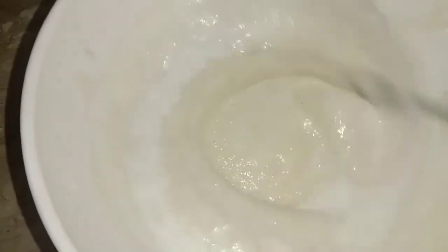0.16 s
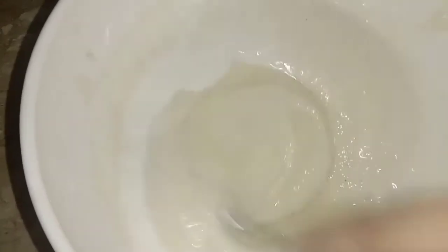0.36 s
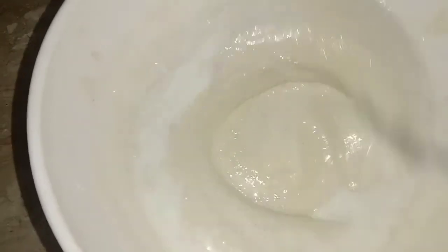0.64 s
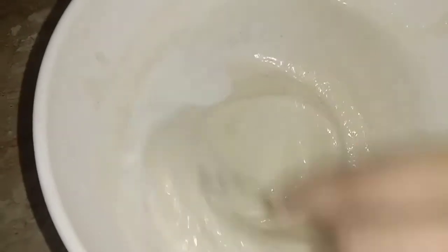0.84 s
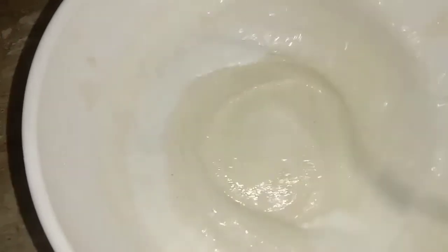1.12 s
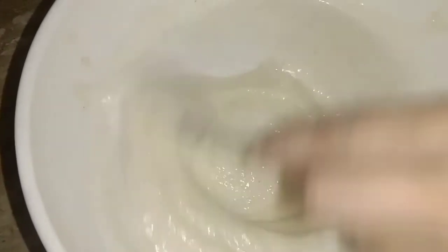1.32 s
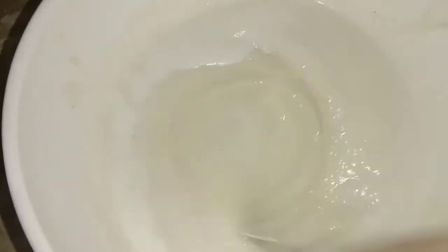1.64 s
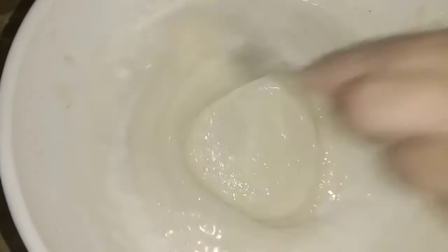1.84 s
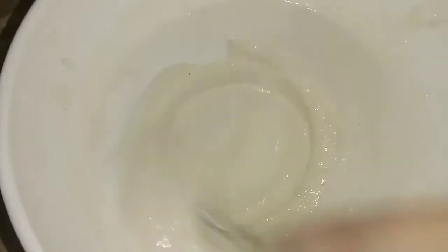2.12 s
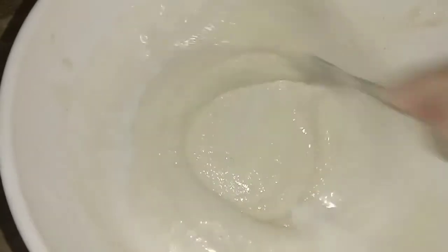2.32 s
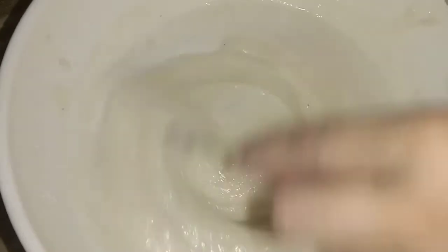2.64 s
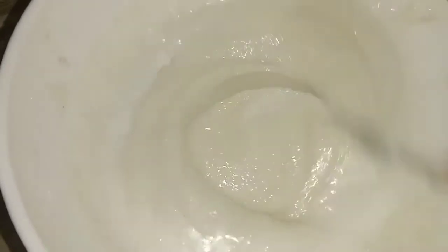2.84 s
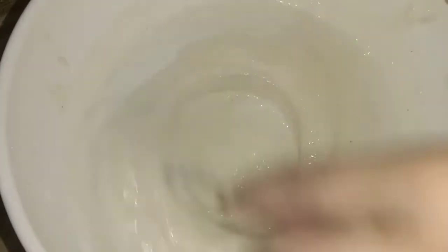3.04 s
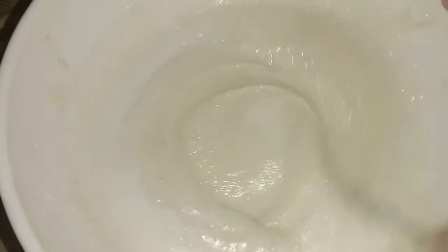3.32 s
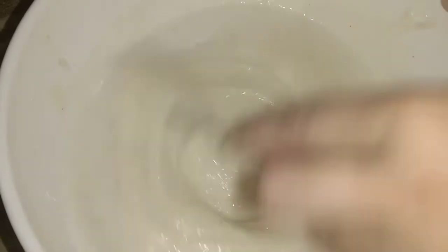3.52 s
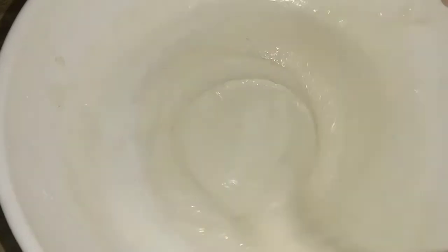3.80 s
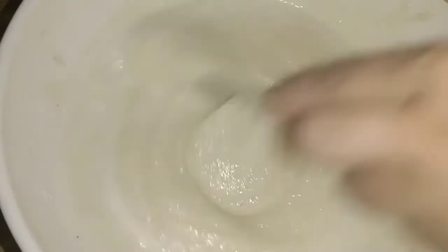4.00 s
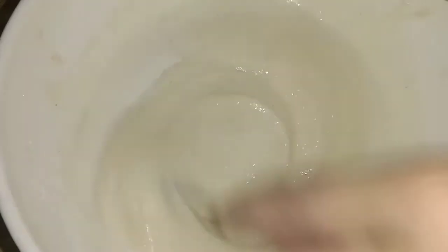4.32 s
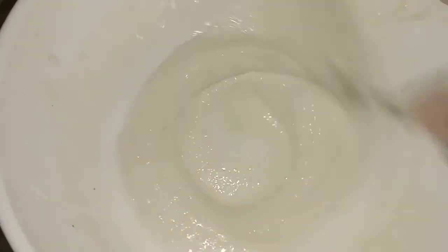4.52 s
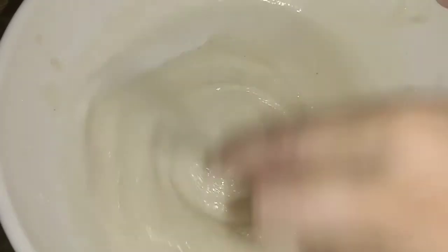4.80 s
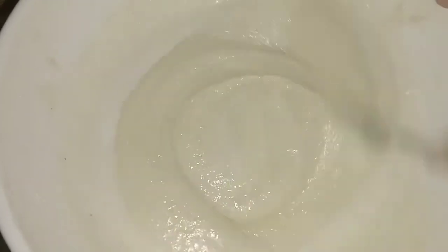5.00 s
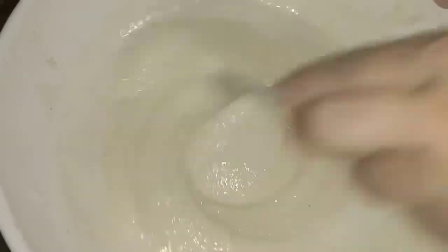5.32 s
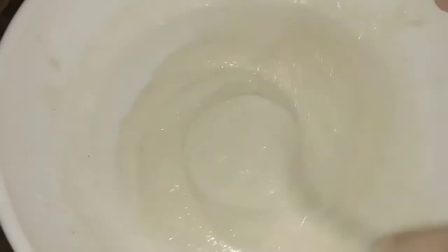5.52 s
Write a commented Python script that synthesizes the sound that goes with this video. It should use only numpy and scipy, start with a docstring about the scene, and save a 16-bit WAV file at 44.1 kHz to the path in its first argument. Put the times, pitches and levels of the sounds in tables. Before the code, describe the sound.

A metal spoon circles a plastic bowl of thin batter, scraping softly then harder, with dull regular knocks and faint wet gurgles.

```python
"""Stirring batter in a bowl

A metal spoon circles a plastic bowl of thin batter, a little over two turns a second, in a quiet kitchen.
Shaped noise scrapes round the wall; gliding tones gurgle behind the spoon, over crackling bubbles and a dull slosh.
Most turns knock the side: decaying modes of bowl and spoon, with noise and a low worktop boom.
About two seconds in, hard rubbing brings rough squealing tones and a judder of the lowest wall modes."""
import sys
import numpy as np
from scipy import signal
from scipy.fft import rfft, irfft
from scipy.io import wavfile

SR = 44100
rng = np.random.default_rng(int(sys.argv[2]) if len(sys.argv) > 2 else 0)


def store_wav(level_fs):
    """Save 16-bit WAV to argv[1]."""
    pcm = np.round(np.clip(np.atleast_2d(level_fs), -1, 1) * 32767)
    wavfile.write(sys.argv[1], SR, pcm.T.astype(np.int16))


N = 249606
T = np.arange(N) / SR  # seconds
FREQS = np.maximum(np.arange(N // 2 + 1) * SR / N, 1)  # Hz

# turns of the spoon: lands_s, sweep_start_s, sweep_length_s, slide_db, sweep_db, wake_db, lifted_db,
# hiss_db (relative to the scrape)
TURNS = [(-.12, 0.067, 0.035, -51, -43, -53.5, -81, 1.5), (0.321, 0.506, 0.048, -55.5, -45, -52.5, -81, -1),
         (0.753, .937, 0.048, -60, -47, -53, -74, 2), (1.2, 1.381, 0.021, -58, -44.5, -51, -77.5, 2),
         (1.623, 1.816, 0.063, -48.5, -40, -35, -35, -0.5),
         (2.043, 2.232, 0.035, -34, -36.5, -40.5, -60.5, -4),
         (2.501, 2.705, 0.029, -48, -36, -41, -51.5, -8.5),
         (2.942, 3.145, 0.031, -41.5, -36.5, -41, -57, -9),
         (3.37, 3.572, 0.022, -45.5, -36.5, -44.5, -65, -6.5),
         (3.817, 4.01, 0.033, -52, -43, -50, -67.5, -5.5),
         (4.227, 4.439, 0.021, -48, -35.5, -43, -62, -7.5), (4.663, 4.87, 0.031, -47.5, -41, -48, -79, -5),
         (5.113, 5.311, 0.052, -53.5, -47, -52, -69, -6.5)]
# colour of the scrape before and after the spoon changes its angle: freq_hz, gain_db
FIRST_ANGLE_COLOUR = [(150, -26.5), (250, -17.5), (452, -17), (640, -21), (955, -14.5), (1140, -8),
                      (1380, -8.5), (1760, -15.5), (3060, 2), (4410, -22), (5830, -7), (6820, -19.5),
                      (9010, -28.5), (14700, -31), (16000, -47.5)]
LATER_ANGLE_COLOUR = [(150, -32), (250, -8), (519, -10), (576, -12), (955, -12.5), (1400, -9), (1980, -27),
                      (2910, 7.5), (3580, 3), (4730, -12.5), (5830, -10.5), (7310, -10), (9010, -26),
                      (14900, -23.5), (16000, -52)]
# resonances that the rubbing excites at each angle: freq_hz, width_hz, boost_db
FIRST_ANGLE_RESONANCES = [(460, 13, 0.5), (2600, 640, 2.5), (2900, 160, 1.5), (3350, 580, 0),
                          (4200, 120, 1), (4470, 700, 2.5), (5640, 1500, 0), (6870, 480, 8.5)]
LATER_ANGLE_RESONANCES = [(2020, 490, 10.5), (2950, 140, 3), (3646, 380, 6), (3966, 46, 12),
                          (4700, 390, -1), (5560, 110, 5), (7600, 780, -1.5)]
# brief drags of the spoon on bare wall: peak_s, level_db
BARE_WALL_DRAGS = [(0.419, -46), (.795, -44.5), (1.495, -48), (1.731, -42.5), (2.3, -40), (2.385, -38.5),
                   (2.834, -38), (3.208, -37.5), (3.691, -39), (4.56, -42.5), (5.166, -41), (5.219, -48),
                   (5.452, -45), (5.637, -34)]
# spoon striking the wall: start_s, strength_db (relative), contact_cutoff_hz,
# spoon_ring_db (relative to the bowl), boom_db (relative)
KNOCKS = [(0.317, -24.5, 1800, -1, -66), (0.758, -45, 6000, -16, -81), (1.381, -37, 12000, 0, -77),
          (1.6122, -4.5, 1630, -33, -43.5), (2.0596, 3, 4630, -38, -40), (2.4911, 3.5, 6100, -9, -43.5),
          (2.9379, -3.5, 3600, -7, -48), (3.3604, 1.5, 7950, -1.5, -41), (3.8058, -3, 6500, -1.5, -45),
          (4.2197, 1, 6200, -2, -41), (4.6522, 2, 5600, -4.5, -36)]
# modes of the bowl damped by batter: freq_hz, level_db, t60_s (limited to LONGEST_RING_S)
BOWL_MODES = [(581.6, -6.5, 0.053), (671, -8.5, 0.038), (890, -19, 0.0096), (1002, -10, 0.026),
              (1096, -17, 0.031), (1438, -10, 0.062), (1629, -11, 0.066), (2068, -2.5, 0.043),
              (2108, 0, 0.027), (2600, 0.5, 0.038), (2698, -0.5, 0.016), (2777, -2, 0.038),
              (3173, -2.5, 0.059), (4920, -13.5, 0.077), (5516, -7, 0.033), (6130, -30, 0.028),
              (6020, -9, 0.055), (6900, -11.5, .03)]
# modes of the spoon held against the wall: freq_hz, level_db, t60_s (limited to LONGEST_RING_S)
SPOON_MODES = [(3580, 4, 0.06), (3820, -3.5, 0.098), (4165, 3, 0.028), (7520, -2, 0.046),
               (7850, -4.5, 0.033), (8450, -27, 0.015)]
# low boom of the bowl on the worktop: freq_hz, level_db, t60_s
WORKTOP_MODES = [(178, -2.5, .11), (218, 1, .12), (258, 0, .12), (326, 2, .15), (362, -4, .1)]
# squeals under hard pressure: start_s, length_s, level_db (relative), bending_lead_db (modes near 5 kHz)
SQUEALS = [(1.82, 0.034, -45, 0), (2.022, 0.011, -31.5, 3.5), (2.095, .05, -27.5, -2),
           (2.16, 0.056, -36, 0), (2.242, 0.0055, -30.5, 8)]
# modes of the squealing spoon: freq_hz, pitch_wander_hz, level_db
SQUEAL_MODES = [(3190, 44, -1.5), (4756, 60, -0.5), (5090, 64, -4.5), (5240, 100, -7), (6420, 70, -2.5),
                (6660, 40, 3.5), (7100, 90, -8.5), (8120, 150, -5.5), (10670, 490, -11.5), (14200, 700, -9)]
# strongest slips that shake the wall: start_s, peak_db
WALL_SLIPS = [(2.023, -22), (2.079, -26), (2.106, -21.5), (2.161, -21), (2.214, -23.5), (2.295, -24.5),
              (2.379, -20.5), (2.426, -32)]
# shudder of the bowl wall under hard rubbing: time_s, moan_db (relative), slip_pitch_hz
WALL_SHUDDER = [(1.66, -45.5, 653), (2.002, -36.5, 648.4), (2.02, -32.5, 644.8), (2.098, -27, 646.6),
                (2.32, -36.5, 647), (2.354, -42.5, 695.4), (2.386, -30.5, 689), (2.47, -38.5, 696)]
# air pockets behind the spoon: start_s, length_s, upper_hz, upper_db, lower_hz, lower_db
AIR_POCKETS = [(0.113, .085, 1333, -60.5, 846, -57.5), (0.31, .02, 1413, -66, 594, -53),
               (.98, 0.084, 1210, -56, 768, -54.5), (1.175, 0.057, 1427, -54.5, 683, -85),
               (1.427, .09, 1120, -60, 707, -57), (2.696, 0.16, 1305, -64.5, 763, -60.5),
               (2.837, .1, 1270, -83, 594, -58.5), (3.091, .2, 1267, -66, 328, -64),
               (3.512, 0.237, 1388, -55, 578, -55), (4.059, 0.098, 1390, -79, 792, -66),
               (4.341, 0.1, 1596, -59.5, 338, -56), (4.42, 0.209, 1670, -52, 472, -58.5),
               (4.724, 0.066, 1630, -47, 608, -58), (5.088, 0.12, 1442, -60.5, 566, -64.5)]
# spectrum of the quiet kitchen: freq_hz, gain_db
KITCHEN_COLOUR = [(25, -8), (60, -6.5), (100, 10), (160, 10), (240, -2), (500, -4.5), (1500, -45),
                  (4000, -53), (16000, -8.5)]

ANGLE_CHANGE_S = 2.5
LAST_LANDING_S, LAST_SLIDE_DB = 5.55, -52  # the spoon comes round once more
# shape of a turn: swell into the sweep, move to the wake level, lift off the wall, hang before landing
SWELL_S, WAKE_S, LIFT_S, LAND_S = 0.033, 0.048, 0.09, 0.026
WAKE_SAG_DB, SWEEP_HISS_DB, LIFT_HISS_DB = 7, 2.5, 1
DRAG_ATTACK_S, DRAG_RELEASE_S, DRAG_HISS_DB = 0.0044, 0.017, -11.5
LONGEST_RING_S = 0.06  # upper limit on ring time of bowl and spoon, so the knocks stay short and dull
SQUEAL_ATTACK_S, SQUEAL_RELEASE_S = 0.0034, 0.019
SHUDDER_DB = -3
POCKET_GLIDE, POCKET_WOBBLE = 0.024, 0.026  # share by which pitch starts high and ends low; share of flutter
SLOSH_DB = -27  # relative to the scrape
KITCHEN_DB = -65.5
TOP_HZ = 16100


def scrape():
    """The spoon slides round the wall, brighter where it runs fast."""
    scrape_db, hiss_db = with_drags(*stirring_levels())
    first = rub(FIRST_ANGLE_COLOUR, FIRST_ANGLE_RESONANCES, scrape_db, hiss_db,
                grain_db=1.0, flutter_db=1.64)
    later = rub(LATER_ANGLE_COLOUR, LATER_ANGLE_RESONANCES, scrape_db, hiss_db,
                grain_db=2.0, flutter_db=2.35)
    return drift(np.where(T < ANGLE_CHANGE_S, first, later), depth_db=1.9, rate=50)


def stirring_levels():
    """Scrape and hiss in dB: most turns land, slide, sweep brighter, fade and lift;
    the hard-pressed turn near 1.6 s stays loud into the next."""
    points = []
    next_landings = [turn[0] for turn in TURNS[1:]] + [LAST_LANDING_S]
    for turn, next_landing in zip(TURNS, next_landings):
        lands, start, length, slide_db, sweep_db, wake_db, lifted_db, hiss_db = turn
        stop = start + length
        bright_db = hiss_db + SWEEP_HISS_DB
        points += [
            (lands, slide_db, hiss_db),
            (start - SWELL_S, slide_db, hiss_db),
            (start, sweep_db, bright_db),
            (stop, sweep_db, bright_db),
            (stop + WAKE_S, wake_db, hiss_db),
            (next_landing - LIFT_S, wake_db - WAKE_SAG_DB, hiss_db),
            (next_landing - LAND_S, lifted_db, hiss_db + LIFT_HISS_DB),
        ]
    points.append((LAST_LANDING_S + SWELL_S, LAST_SLIDE_DB, hiss_db))
    times, scrape_db, hiss_db = np.transpose(sorted(points))
    return np.interp(T, times, scrape_db), np.interp(T, times, hiss_db)


def with_drags(scrape_db, hiss_db):
    """Brief dull drags bite, die away and add their power to the scrape."""
    drags = 0
    for peak_s, db in BARE_WALL_DRAGS:
        decay = np.maximum((peak_s - T) / DRAG_ATTACK_S, (T - peak_s) / DRAG_RELEASE_S)
        drags = drags + undb(db) * np.exp(-decay)
    body = np.hypot(undb(scrape_db), drags)
    hiss = np.hypot(undb(scrape_db + hiss_db), undb(DRAG_HISS_DB) * drags)
    return 20 * np.log10(body), 20 * np.log10(hiss / body)


def rub(colour, resonances, scrape_db, hiss_db, grain_db, flutter_db):
    """Dense tiny catches of metal on wet plastic, bunched by the unsteady hand."""
    is_catch = rng.random(N) < 3500 / SR  # about 3500 catches a second
    grain = undb(grain_db * np.minimum(rng.exponential(size=N), 5))
    catches = is_catch * rng.standard_normal(N) * grain
    smooth_rubbing = rng.standard_normal(N)
    force = (unit(catches) + smooth_rubbing) * undb(flutter_db * walk(110))

    boost_db = sum(db * np.exp(-2 * ((FREQS - hz) / width) ** 2) for hz, width, db in resonances)
    gain = contour(colour) * undb(boost_db) * wall_modes(ripple_db=2.2)
    treble = 1 / (1 + (4600 / FREQS) ** 10)  # crossover between body and hiss

    # each part is levelled by the rms of a band inside it
    body_rms = np.std(shape(force, gain * (FREQS > 2200) * (FREQS < 4400)))
    hiss_rms = np.std(shape(force, gain * (FREQS > 5000) * (FREQS < 9000)))
    body = shape(force, gain * (1 - treble)) / body_rms
    hiss = shape(force, gain * treble) / hiss_rms
    return undb(scrape_db) * (body + undb(hiss_db) * hiss)


def wall_modes(ripple_db):
    """The crowded upper modes of the bowl ripple the spectrum every hundred Hz or so."""
    hz = np.linspace(0, SR / 2, 190)
    return undb(ripple_db * np.interp(FREQS, hz, rng.standard_normal(len(hz))))


def drift(x, depth_db, rate):
    """The contact point travels, so neighbouring quarter-octave bands swell and fade on their own."""
    place = 4 * np.log2(np.clip(FREQS, 500, 16000) / 500)
    spectrum = rfft(x)
    out = np.zeros(N)
    for k in range(21):
        band = irfft(spectrum * np.maximum(1 - abs(place - k), 0), N)
        out += band * undb(depth_db * walk(rate))
    return out


def knocks():
    """Each blow rings bowl and spoon; batter between them dulls it; the worktop booms a moment later."""
    out, t = np.zeros(N), T[:SR // 3]
    bowl, spoon = limit_ring(BOWL_MODES), limit_ring(SPOON_MODES)
    contact = 1 - np.exp(-t / 0.0005)
    late_swell = 1 - np.exp(-(t / 0.024) ** 2)
    for start, db, contact_hz, spoon_db, boom_db in KNOCKS:
        bowl_ring = ring(bowl, t, scatter_db=1.0, wobble=0.016)
        spoon_ring = undb(spoon_db) * ring(spoon, t, scatter_db=1.0, wobble=0.022)
        crack = undb(-3) * band_noise(t, 520, 19845) * np.exp(-t / 0.0098)
        # a diffuse, uneven noise tail of the bowl's dense modes dies away, with a duller part swelling in
        tail_gain = undb(-23.0 + 4.6 * walk(400, size=len(t)))
        tail = tail_gain * band_noise(t, 680, 5100) * np.exp(-t / 0.036)
        dull_gain = undb(-21.5 + 1.6 * walk(150, size=len(t)))
        dull_tail = dull_gain * band_noise(t, 590, 2500) * np.exp(-t / 0.029) * late_swell
        blow = (bowl_ring + spoon_ring + crack + tail + dull_tail) * contact
        add(out, start, undb(db - 16.0) * lowpass(blow, contact_hz))

        boom = ring(WORKTOP_MODES, t, scatter_db=1.5, wobble=0.04) * late_swell
        thud = undb(-18.5) * band_noise(t, 74, 280) * np.exp(-t / 0.018)
        add(out, start, undb(boom_db + 12.5) * (boom + thud))
    return out


def limit_ring(modes):
    """Limit every mode's ring time, so the knocks stay short and dull."""
    return [(hz, db, min(t60, LONGEST_RING_S)) for hz, db, t60 in modes]


def ring(modes, t, scatter_db, wobble):
    """Decaying modes; each blow weights them anew and the sloshing batter detunes them."""
    out = 0
    for mode_hz, db, t60 in modes:
        hz = mode_hz * (1 + wobble * walk(263, size=len(t)))
        phase = 2 * np.pi * (rng.random() + np.cumsum(hz) / SR)
        level = undb(db + scatter_db * rng.standard_normal())
        out = out + level * np.sin(phase) * np.exp(-np.log(1000) * t / t60)
    return out


def squeal():
    """Pressed hard, the spoon sticks and slips and sings roughly in its own modes, in short bursts."""
    level, bending_level = 0, 0
    for start, length, db, lead_db in SQUEALS:
        attack = np.minimum(T - start, 0) / SQUEAL_ATTACK_S
        release = np.maximum(T - start - length, 0) / SQUEAL_RELEASE_S
        burst = np.exp(attack - release)
        level = np.maximum(level, undb(db) * burst)
        bending_level = np.maximum(bending_level, undb(db + lead_db) * burst)
    tones = 0
    for mode_hz, wander_hz, mode_db in SQUEAL_MODES:
        phase = 2 * np.pi * np.cumsum(mode_hz + wander_hz * walk(900)) / SR
        is_bending = abs(mode_hz - 5000) < 600
        mode_level = bending_level if is_bending else level
        tones = tones + mode_level * undb(mode_db + 2.5 * walk(220)) * np.sin(phase)
    # every burst also rasps over the whole treble
    rasp = undb(-5 + 2.5 * walk(400)) * lowpass(band_noise(T, 4300, 16000), 7500, order=1)
    return (tones + level * rasp) * undb(-2.0)


def judder():
    """Hard rubbing keeps the lowest wall modes shuddering; each slip swells them and the batter soon damps them."""
    swells, t = np.zeros(N), T[:SR // 8]
    swell = (1 - np.exp(-(t / 0.0033) ** 2)) * np.exp(-t / 0.013)
    for start, db in WALL_SLIPS:
        add(swells, start, undb(db) * swell / swell.max())
    times, moan_db, wall_hz = np.transpose(WALL_SHUDDER)
    hz = np.interp(T, times, wall_hz) * (1 + 0.0392 * walk(250))
    slips = swells * np.sin(2 * np.pi * np.cumsum(hz) / SR)
    moan_gain = undb(np.interp(T, times, moan_db, left=-120, right=-120) + SHUDDER_DB)
    return slips + moan_gain * band_noise(T, 577, 735)


def gurgles():
    """The hollow behind the spoon opens quickly, resonates roughly and sinks in pitch as the batter closes in."""
    out = np.zeros(N)
    for start, length, upper_hz, upper_db, lower_hz, lower_db in AIR_POCKETS:
        n = int(length * SR)
        for centre_hz, db in ((upper_hz, upper_db), (lower_hz, lower_db)):
            roughness = 1 + 0.45 * walk(300, size=n)
            glide = POCKET_GLIDE * np.linspace(1, -1, n)
            hz = centre_hz * (1 + glide + POCKET_WOBBLE * walk(343, size=n))
            opening = np.sqrt(np.abs(np.sin(np.linspace(0, np.pi, n))))
            swell = opening * undb(1.8 * walk(132, size=n))
            tone = np.sin(2 * np.pi * np.cumsum(hz) / SR)
            add(out, start, undb(db) * unit(swell * roughness * tone))
    return out


def bubbles():
    """Tiny bubbles crackle at random moments as short rising chirps, as loud as the spoon is brisk."""
    out, t = np.zeros(N), T[:SR // 50]
    scrape_db, hiss_db = stirring_levels()
    for when, pitch, strength in rng.random(size=(700, 3)):
        i = int(when * N)
        hz = 2600 * 3 ** pitch
        # higher bubbles follow the hiss more; a few stand out
        db = scrape_db[i] + pitch * (hiss_db[i] - 1.5) - 2 + 14 * strength ** 3
        chirp = np.sin(2 * np.pi * hz * t * (1 + 5 * t)) * np.exp(-t * hz / 7)
        add(out, T[i], undb(db) * chirp)
    return out


def slosh():
    """The batter that the spoon pushes ahead rushes dully, as loud as the spoon is brisk."""
    scrape_db, _ = stirring_levels()
    return undb(scrape_db + SLOSH_DB + 3 * walk(40)) * band_noise(T, 35, 330)


def kitchen():
    """Faint steady noise, mostly low rumble."""
    return undb(KITCHEN_DB) * unit(shape(rng.standard_normal(N), contour(KITCHEN_COLOUR)))


def room(x, wet_db, t60_low, t60_high):
    """Diffuse kitchen echo of decaying noise, with separate ring times below and above about 2.9 kHz."""
    t = T[:SR // 2]
    noise = rng.standard_normal(len(t))
    low = lowpass(noise, 2900)
    low_tail = low * np.exp(-np.log(1000) * t / t60_low)
    high_tail = 0.5 * (noise - low) * np.exp(-np.log(1000) * t / t60_high)
    tail = (low_tail + high_tail) * (1 - np.exp(-(t / 0.0082) ** 2))
    return x + undb(wet_db) * signal.fftconvolve(x, tail / np.linalg.norm(tail))[:N]


def undb(db):
    """Decibels to gain."""
    return 10 ** (np.asarray(db) / 20)


def unit(x):
    """Scale to rms 1."""
    return x / np.sqrt(np.mean(x ** 2))


def add(out, start, sound):
    """Mix a sound in at a time in seconds."""
    i = max(int(start * SR), 0)
    out[i:i + len(sound)] += sound[:max(N - i, 0)]


def contour(points):
    """Gain at every frequency from (Hz, dB) points."""
    hz, db = np.transpose(points)
    return undb(np.interp(np.log(FREQS), np.log(hz), db))


def shape(x, gain):
    """Filter by a gain at every frequency."""
    return irfft(rfft(x) * gain, N)


def lowpass(x, hz, order=2):
    """Causal low-pass."""
    return signal.sosfilt(signal.butter(order, hz, fs=SR, output="sos"), x)


def band_noise(t, low_hz, high_hz):
    """Noise between two frequencies, at rms 1."""
    sos = signal.butter(3, [low_hz, high_hz], "band", fs=SR, output="sos")
    return unit(signal.sosfilt(sos, rng.standard_normal(len(t))))


def walk(rate, size=N):
    """Smooth chance with spread near 1, moving between random values `rate` times a second."""
    steps = rng.standard_normal(4096)
    return 1.2 * np.interp(T[:size] * rate, np.arange(len(steps)), steps)


def scene():
    """Stirring over the faint kitchen; knocks shake the whole bowl and reach further into the room."""
    spoon_and_batter = scrape() + squeal() + judder() + gurgles() + bubbles()
    stirring = room(spoon_and_batter, wet_db=-18, t60_low=0.22, t60_high=0.15)
    blows = room(knocks(), wet_db=-7.0, t60_low=0.26, t60_high=0.4)
    return (stirring + blows + slosh() + kitchen())[None]


def record(dry):
    """A steep low-pass cuts the top."""
    return signal.sosfilt(signal.ellip(10, 0.2, 70, TOP_HZ, fs=SR, output="sos"), dry)


dry = scene()
out = record(dry)
store_wav(out)
```